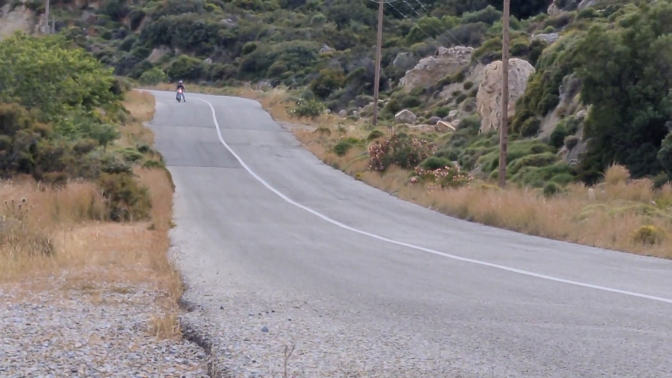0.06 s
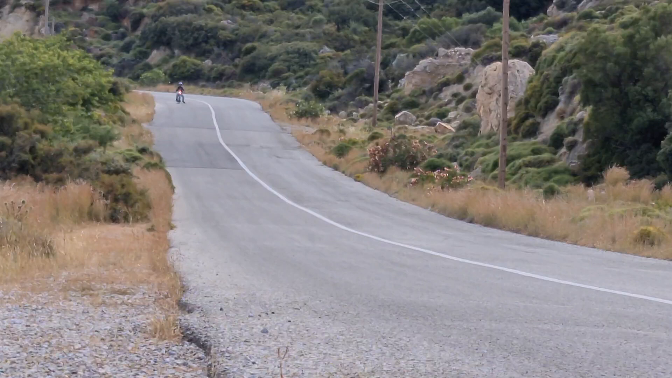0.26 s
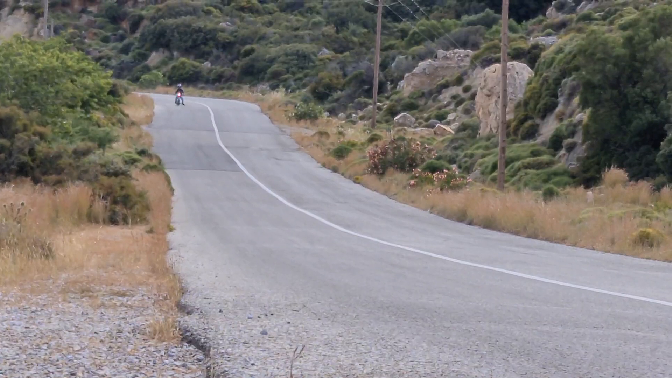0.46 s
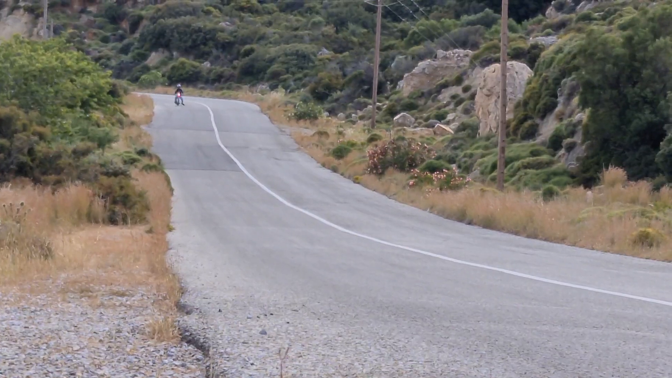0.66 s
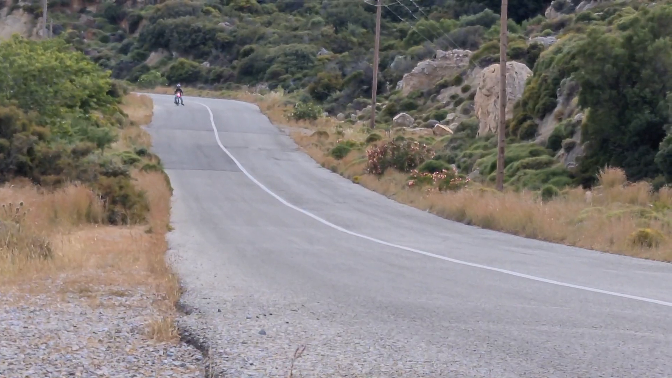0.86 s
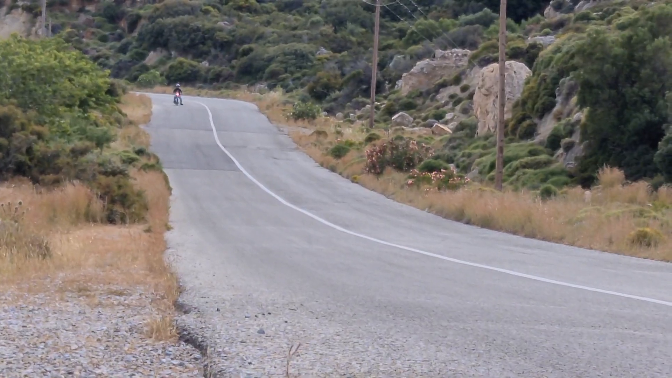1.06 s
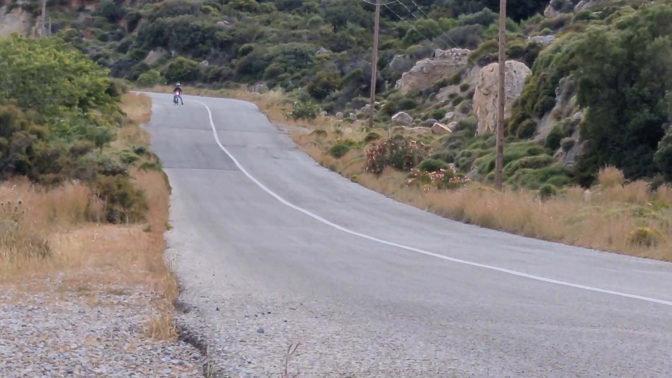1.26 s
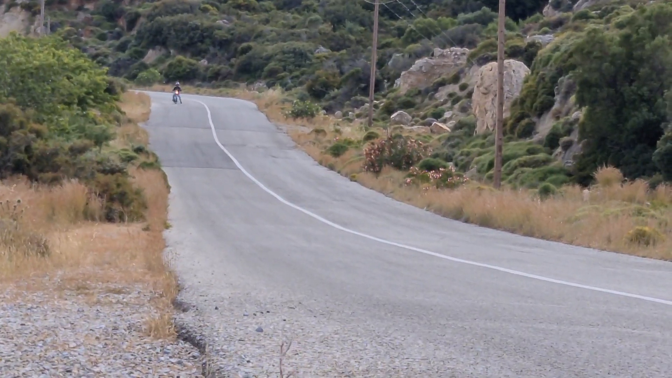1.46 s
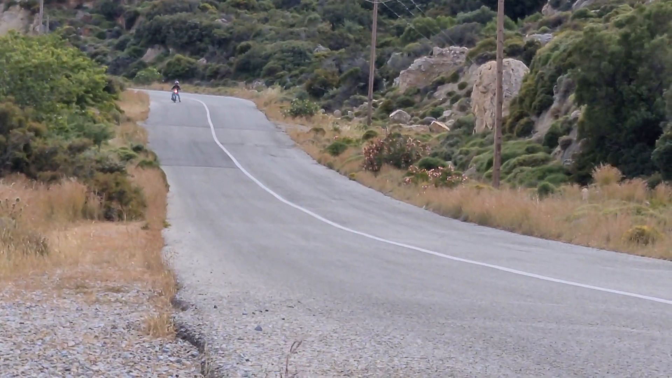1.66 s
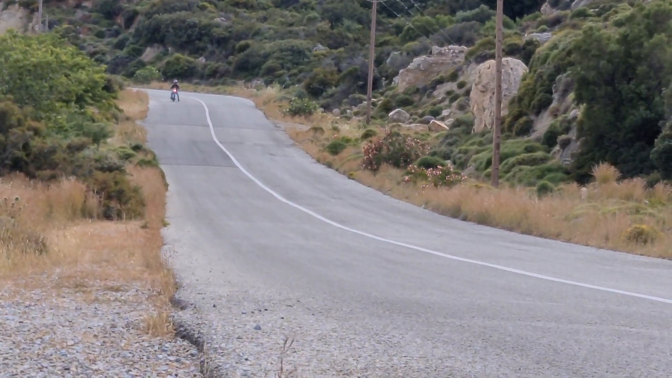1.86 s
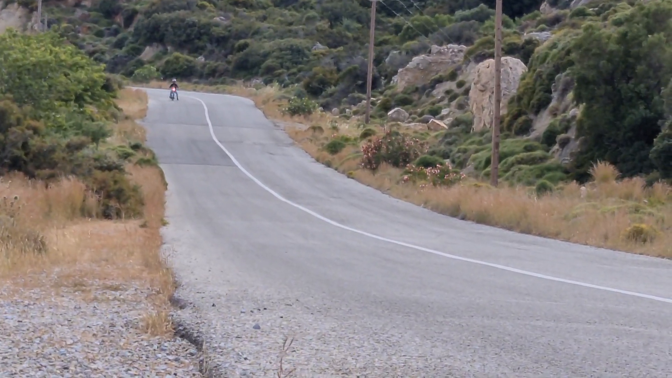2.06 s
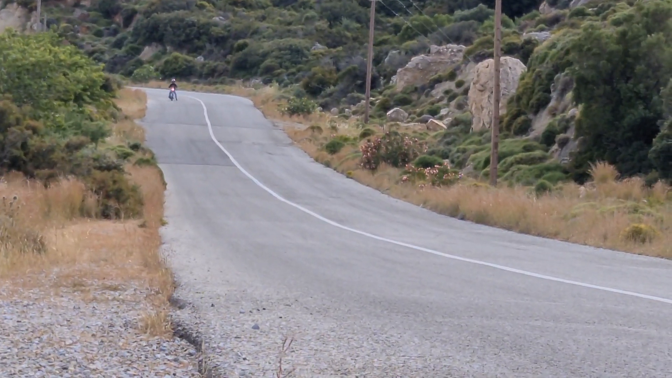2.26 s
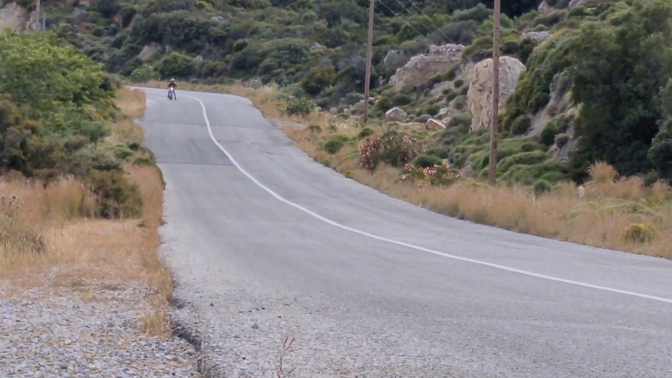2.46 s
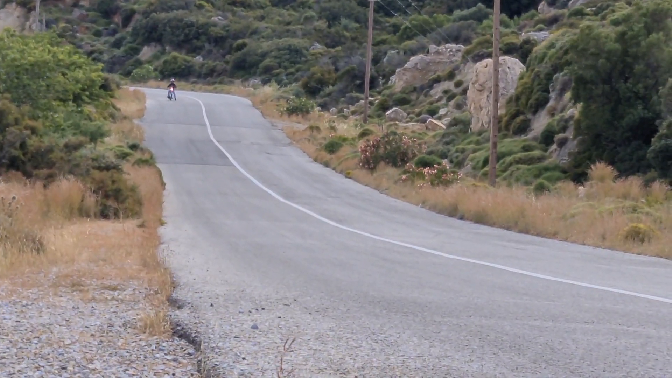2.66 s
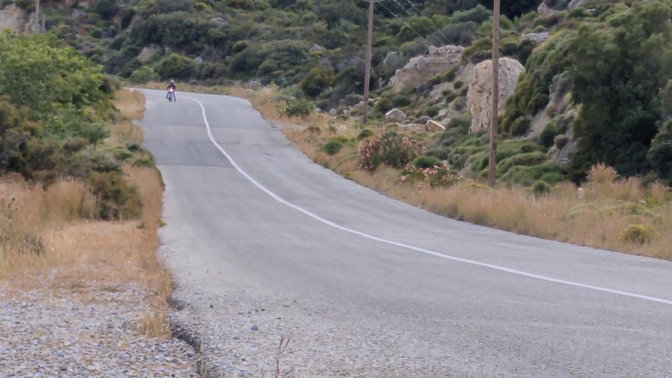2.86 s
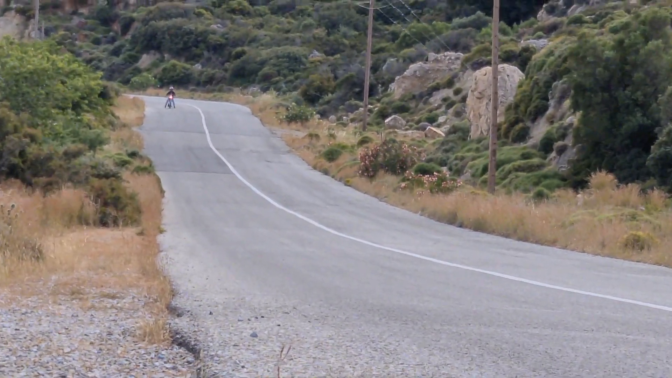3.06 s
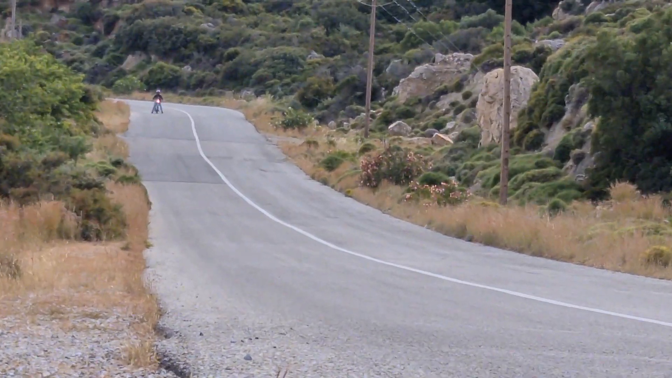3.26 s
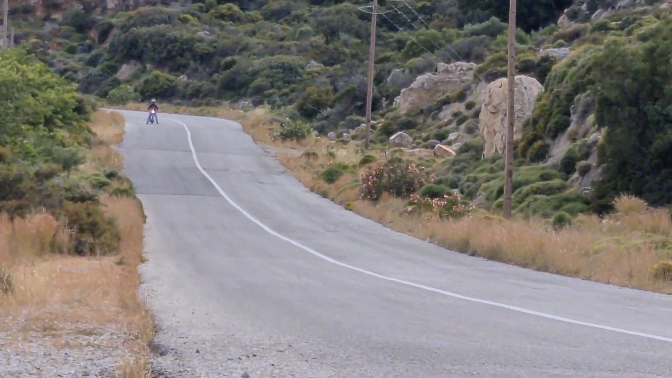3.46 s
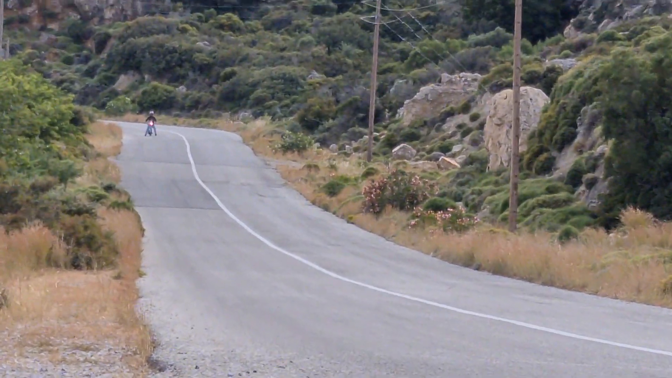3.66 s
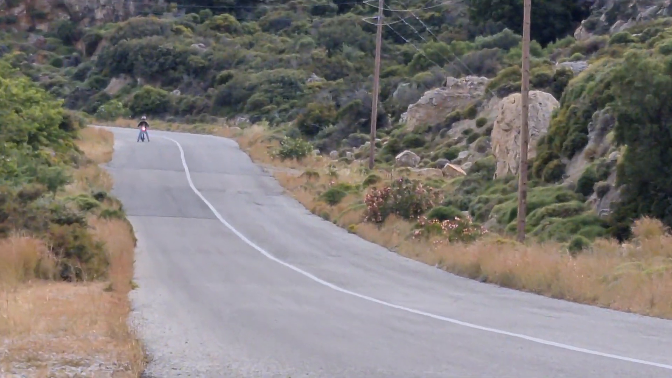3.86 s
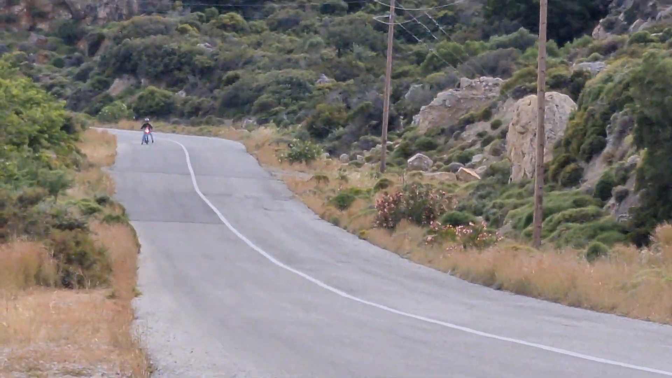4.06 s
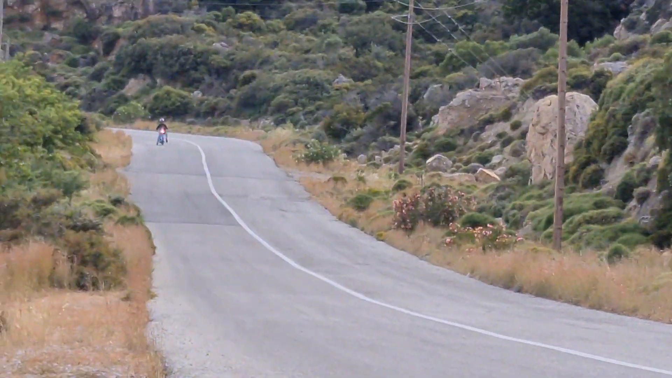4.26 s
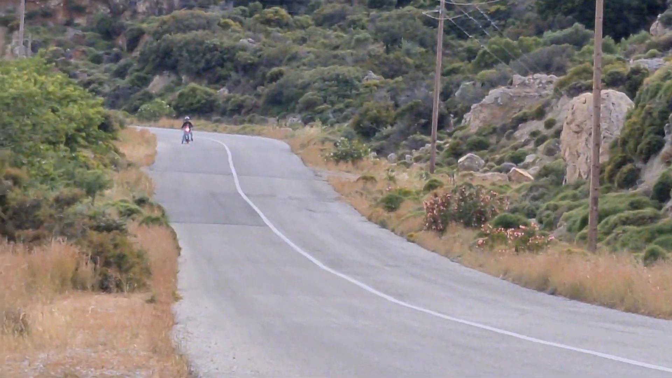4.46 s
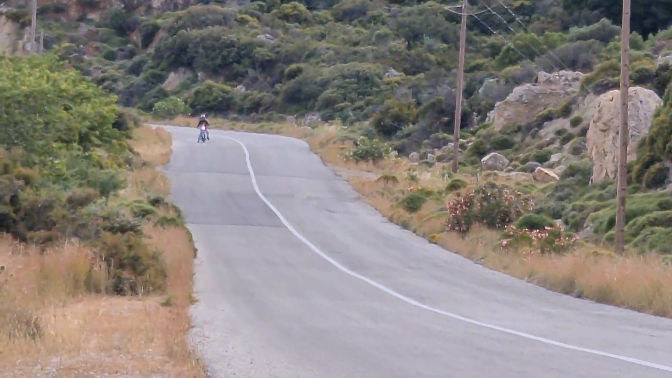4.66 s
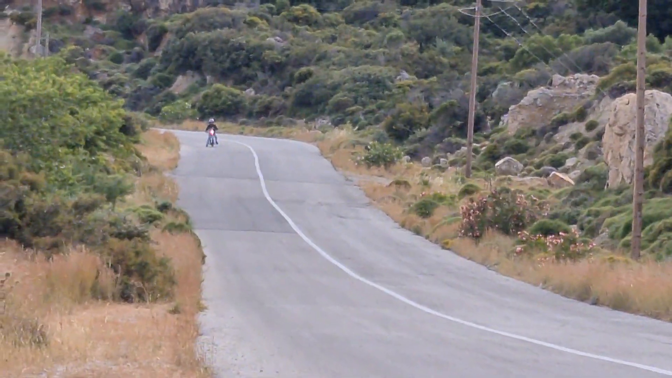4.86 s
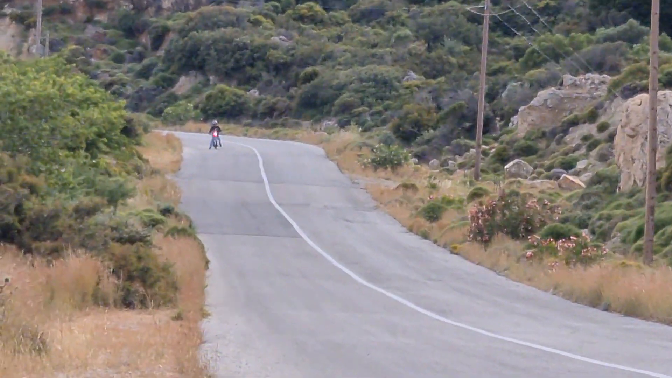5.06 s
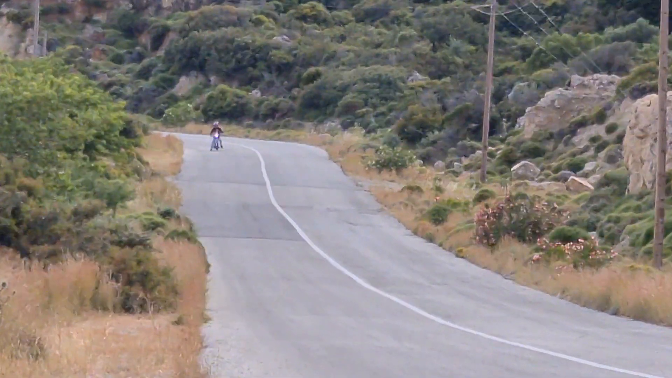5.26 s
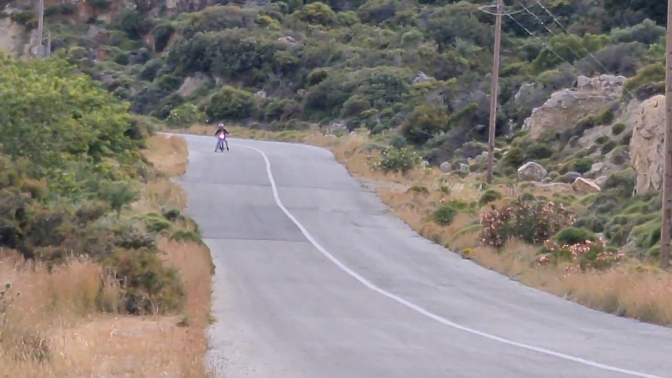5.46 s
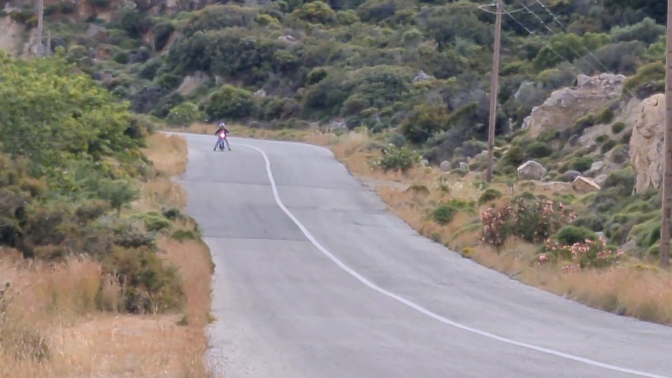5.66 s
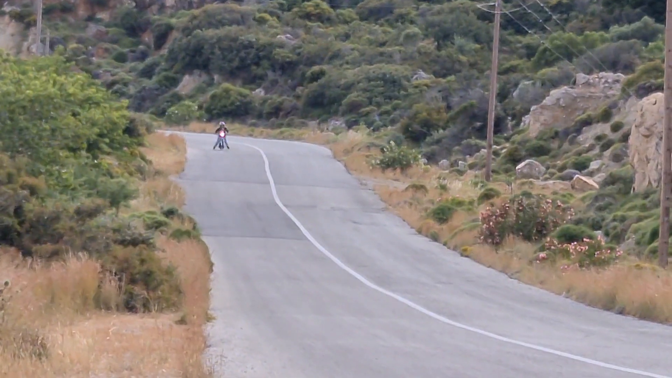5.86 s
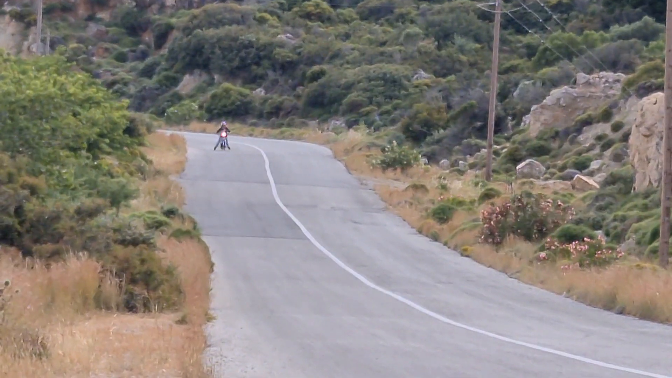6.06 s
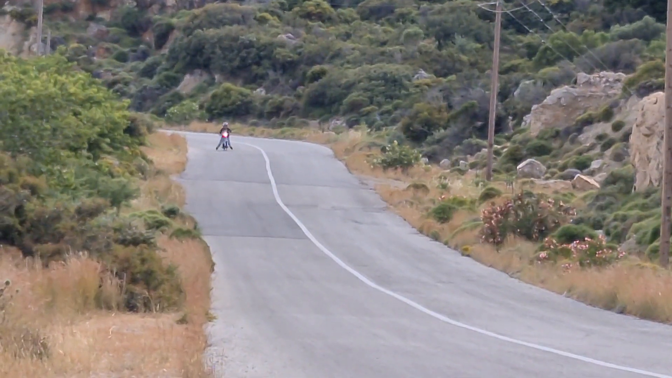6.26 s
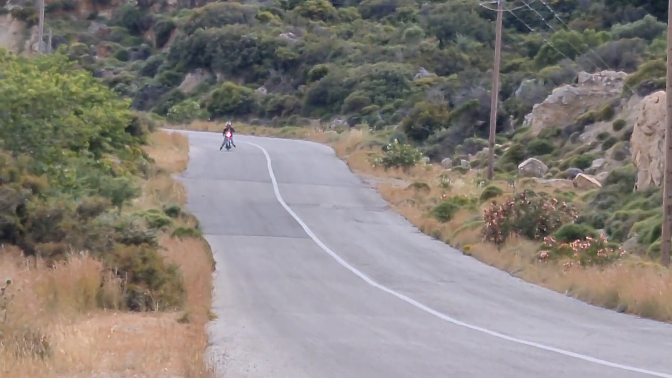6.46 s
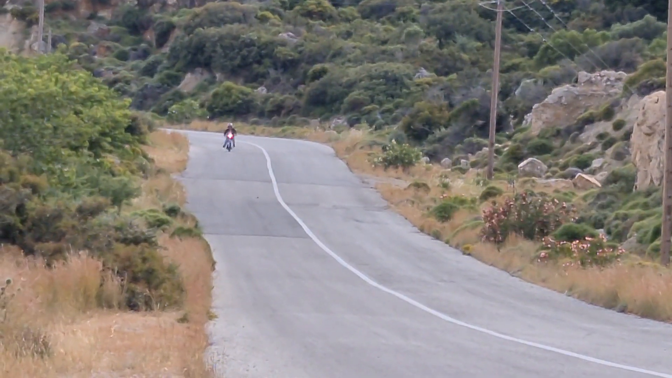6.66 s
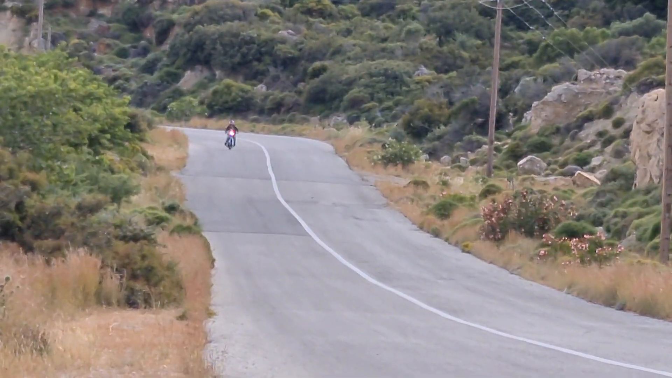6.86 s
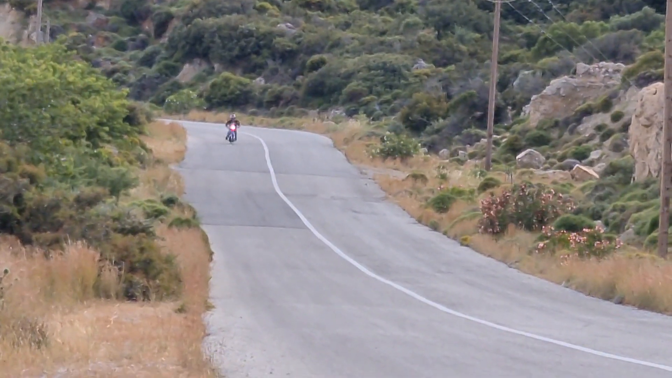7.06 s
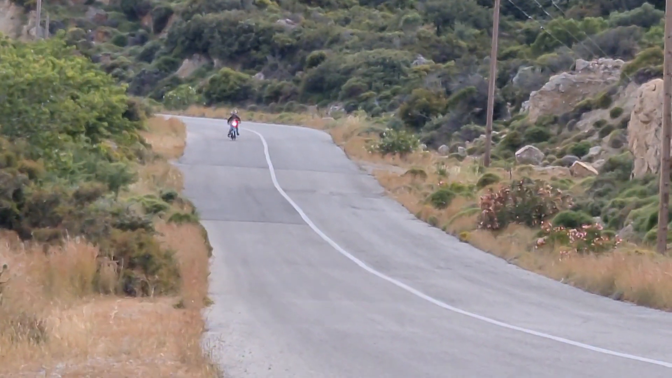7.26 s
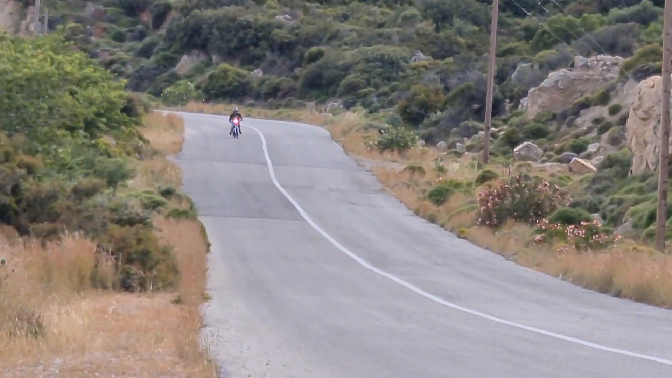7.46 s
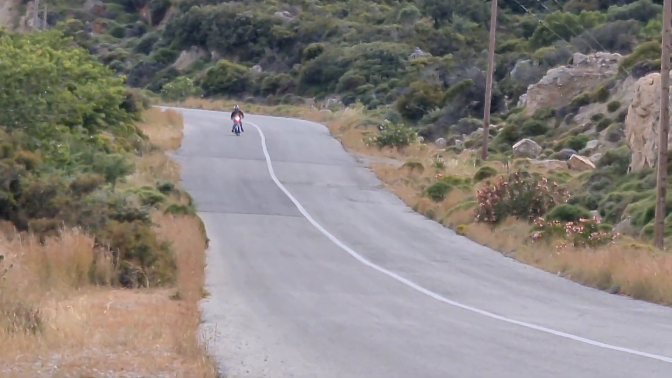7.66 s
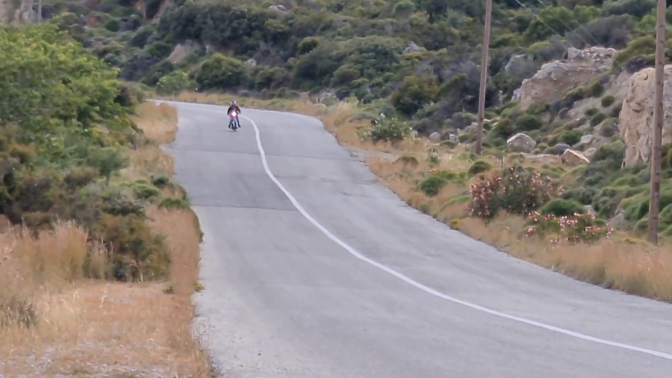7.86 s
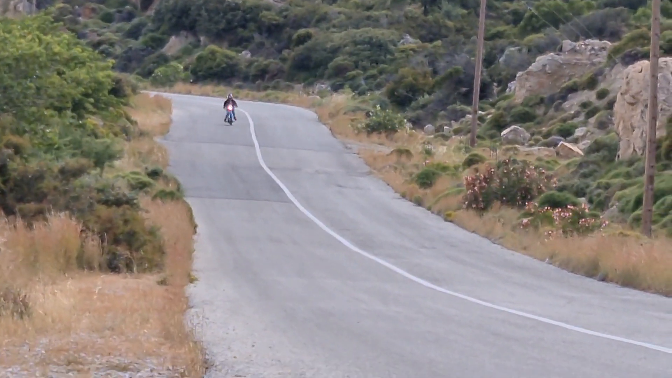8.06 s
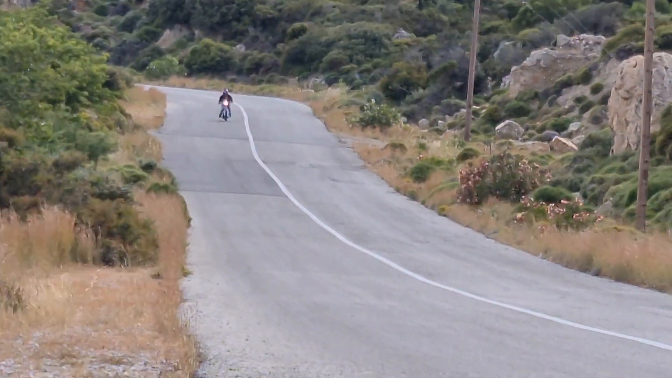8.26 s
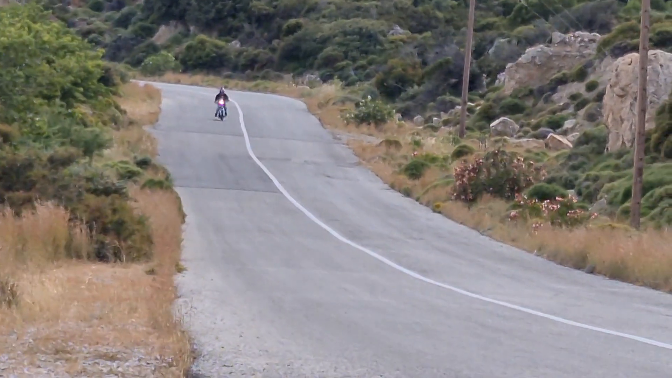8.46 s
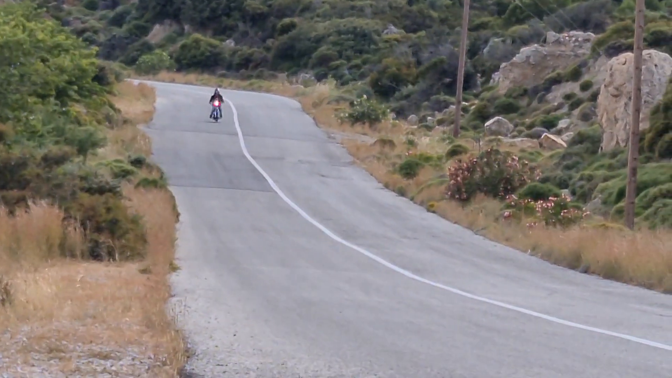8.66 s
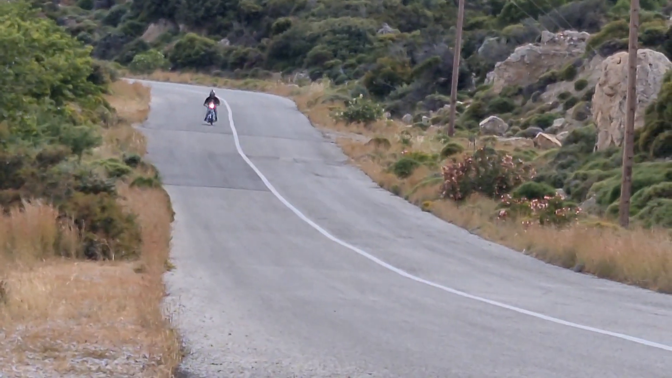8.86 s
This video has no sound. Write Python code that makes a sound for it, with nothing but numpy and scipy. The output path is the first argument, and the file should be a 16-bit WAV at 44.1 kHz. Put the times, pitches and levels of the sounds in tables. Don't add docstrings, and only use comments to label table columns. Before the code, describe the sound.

A small single-cylinder two-stroke starts on a dying rev blip and settles into an irregular, thumping idle with faint ticks. Throttle blips follow, then a held stuttering note, sharp crackles while the clutch slips, and two hard rising surges. After a quick gear change the pitch drops and climbs again, louder and nearer. Open country road, light hillside reflections, low wind buffeting the stereo microphone.

```python
import sys
import numpy as np
from scipy import signal
from scipy.fft import rfft, irfft, next_fast_len
from scipy.io import wavfile
from scipy.ndimage import uniform_filter1d, map_coordinates

SR = 44100
rng = np.random.default_rng(int(sys.argv[2]) if len(sys.argv) > 2 else 0)


def pcm_store(signal):
    levels = np.round(np.clip(np.atleast_2d(signal), -1, 1) * 32767)
    wavfile.write(sys.argv[1], SR, levels.astype(np.int16).T)


def gain_from_decibels(decibels):
    exponent = np.asarray(decibels, float) / 20
    return 10 ** exponent


N = 393372
T = np.arange(N) / SR


def unit(x):
    return x / np.sqrt(np.mean(x ** 2) + 1e-20)


def even(x):
    power = uniform_filter1d(uniform_filter1d(x ** 2, size=2600), size=2600)
    return x / np.sqrt(abs(power) + 0.42 * np.mean(x ** 2, axis=-1, keepdims=True))


def along(points, hz):
    f, v = np.transpose(points)
    return np.interp(np.log(hz + 1), np.log(f + 1), v)


def curves(rows):
    s, *cols = np.transpose(rows)
    return [np.interp(T, s, c) for c in cols]


def during(start, end):
    return np.clip(np.minimum(T - start, end - T) / 0.0092, 0, 1)


def during_runs(runs):
    return sum(during(run[0][0], run[-1][0]) for run in runs)


def wobble(rate):
    return map_coordinates(rng.standard_normal(int(N * rate / SR) + 4), [T * rate])


def filtered(x, response):
    m = next_fast_len(N + SR // 2)
    return irfft(rfft(x, m) * response(np.fft.rfftfreq(m, 1 / SR)), m)[..., :N]


def ringing(x, modes, low_hz, high_hz, hollow=False):
    sign = 1 if hollow else -1

    def response(f):
        peaks = sum(sign ** k * gain_from_decibels(db) * 1j * f * w / (c * c - f * f + 1j * f * w)
                    for k, (c, w, db) in enumerate(modes))
        low_cut = (1j * f / (low_hz + 1j * f)) ** 2
        return peaks * low_cut / (1 - (f / high_hz) ** 2 + 1j * f / high_hz) ** 2
    return filtered(x, response)


def without(x, share, band_hz, width_hz):
    return x - share * signal.lfilter(*signal.iirpeak(band_hz, band_hz / width_hz, SR), x)


def pulses(times, sizes):
    at = np.clip(times * SR, 0, N - 2)
    first, part = at.astype(int), at % 1
    return np.bincount(first, sizes * (1 - part), N) + np.bincount(first + 1, sizes * part, N)


def bursts(train, decay):
    return signal.lfilter([1], [1, -np.exp(-1 / (decay * SR))], train) * rng.standard_normal(N)


# t/s, crank f/Hz, level/dB, throttle/0-1
BLIPS = [
    [(0.012, 55.93, -17, 0), (0.058, 60.7, -19.5, 0.6), (0.104, 62.83, -24, 0), (0.23, 54.33, -27.5, 0.03),
     (0.458, 43.5, -30.5, 0.1), (0.554, 37.47, -38, 0.01), (0.8, 31, -51, 0)],
    [(3.419, 30.34, -28, 0.5), (3.485, 41.87, -22, 0.6), (3.563, 53.8, -19, 0.7),
     (3.607, 56.75, -23.5, 0.5), (3.863, 43.22, -28.5, 0), (3.971, 33.88, -26.5, 0.6),
     (4.115, 58, -21, 0.8), (4.2, 61.4, -19.5, 0.6)],
    [(4.212, 65.1, -20.5, 0.6), (4.29, 66.9, -18.5, 0.7)],
    [(4.292, 63.9, -21, 0.1), (4.418, 57.47, -26, 0), (4.45, 57.9, -22.5, 0.05)],
    [(4.461, 56.4, -26.5, 0.82), (4.507, 57.36, -23.5, 0.7), (4.749, 57.65, -21.5, 0.7),
     (5.03, 60.73, -21, 0.85)],
]
# t/s, crank f/Hz, level/dB, throttle/0-1
SLIP = [(5.04, 62.8, -20.5, 0.83), (5.08, 63.04, -21, 0.32), (5.4, 62.56, -21.5, 0.11),
        (5.749, 64.04, -22.5, 0.15), (5.989, 64.8, -23, 0.44), (6.109, 64.5, -21.5, 0.72)]
SURGE = [(6.131, 67.6, -20, 0.63), (6.179, 73.2, -16, 1), (6.219, 77.37, -17, 0.7),
         (6.409, 84.14, -17.5, 0.3), (6.497, 86.34, -14, 0.37), (6.662, 84.5, -17.5, 0.28),
         (6.779, 82.1, -15, 0.16), (7.01, 72.4, -18, 0.29), (7.075, 69.83, -15.5, 1)]
AGAIN = [(7.111, 71, -20.5, 1), (7.16, 75.16, -16.5, 0.54), (7.36, 91.06, -16.5, 0.097),
         (7.56, 102.9, -14.5, 0.69), (7.65, 107.8, -13.5, 0.55), (7.772, 106, -11.5, 0.25),
         (7.85, 100.1, -18.5, 0.68), (7.928, 97.85, -14, 0.39), (7.99, 90.2, -13, 0.38)]
GEAR = [(8.058, 72.94, -15.5, 0.29), (8.502, 85.2, -12.5, 0.18), (8.7, 90.3, -11.5, 0.23),
        (8.92, 96.3, -6, 0.23)]
RUNS = BLIPS + [SLIP + SURGE + AGAIN + GEAR]
IDLE_END_S, HELD_S, SLIP_S, BITE_S = BLIPS[1][0][0], BLIPS[4][0][0], SLIP[0][0], SLIP[-1][0]


def rider():
    hz, level_db, throttle = curves(sum(RUNS, []))
    return hz, level_db, np.clip(throttle, 0, 1)


def in_gear():
    return np.clip((T - BITE_S) / 0.066, 0, 1)


SHIFT_S = 7.858


def shifting():
    return np.clip((.046 - abs(T - SHIFT_S)) / 0.055, 0, 1)


def gaining(hz):
    return uniform_filter1d(np.clip(np.gradient(hz) * SR / 68, .05, 1), size=900)


# t/s, crack level/dB
BANGS = [(4.4044, -44), (5.0858, -28), (5.1796, -36), (5.2579, -36), (5.3692, -32), (5.4475, -34),
         (5.5418, -31), (5.6201, -27), (5.6984, -33), (5.7932, -36), (5.8875, -30), (5.9798, -35),
         (6.0586, -30), (7.7444, -28)]


def kicks():
    s = np.transpose(BANGS)[0][1:-1]
    moments = np.ravel([s - .006, s + .006], "F")
    swing = np.tile([-1, 1], len(s))
    swing[-1] = 0
    return 1 + 0.032 * np.interp(T, moments, swing, left=0)


def crank(run):
    hz = np.interp(T, *np.transpose(run)[:2])
    return np.cumsum(hz * kicks() * ((T >= run[0][0]) & (T < run[-1][0]))) / SR


def crank_angle():
    return 2 * np.pi * sum(crank(run) * (T >= run[0][0]) * (T < run[-1][0]) for run in RUNS)


# t/s, ragged share/0-1
RAGGED = [
    (0, .05),
    (3.4, .04),
    (4.46, .025),
    (5.04, .08),
    (6.15, .02),
    (7.72, .14),
    (7.82, .03),
    (7.9, .05),
    (8.07, .015),
]


def raggedness():
    s, share = np.transpose(RAGGED)
    steps = share[np.searchsorted(s, T, side="right") - 1]
    return uniform_filter1d(steps, size=2000) + .06 * (1 - rider()[2])


SECOND_DB = [0, 0, -11, -1, -12, 0]


def firings():
    ragged = raggedness()
    late = np.r_[-1, np.transpose(BANGS)[0]]
    train = np.zeros(N)
    for run, second_db in zip(RUNS, SECOND_DB):
        turns = crank(run)
        count = np.arange(int(turns[-1] + .5))
        s = np.interp(count, turns + 1e-9 * T, T) + (count == 0) * run[0][0]
        since = s - late[np.searchsorted(late, s + .006) - 1]
        luck = rng.standard_normal((len(s), 2)) * np.interp(s, T, ragged)[:, None]
        size_db = second_db * (count % 2) + 3 * np.exp(-abs(since) / .025) + 14 * luck[:, 1]
        train += pulses(s + .0011 * luck[:, 0], gain_from_decibels(size_db))
    return train, ragged


# f/Hz, width/Hz, level/dB
PIPE = [(122, 100, -10), (196, 42, -3.5), (269.3, 32, 7.5), (303, 580, 0)]


def exhaust(gas, pipe_db):
    push, skipping = gas(PIPE, 58, 528), during(HELD_S, SLIP_S)
    steady = np.roll(push, -150)
    four_stroking = 0.61 * np.roll(push, 640) + 1.23 * np.roll(push, -170)
    receding_db = -4 * np.clip((T - ROAD_FROM_S) / 0.96, 0, 1)
    level = gain_from_decibels(pipe_db - 3.0 + receding_db - 16 * shifting())
    return level * ((1 - skipping) * steady + skipping * four_stroking)


# f/Hz, width/Hz, level/dB
INTAKE = [(426.6, 15, 1.5), (528.3, 29, 8.5), (550, 170, -7.5), (593, 350, -4)]
# f/Hz, width/Hz, level/dB
HONK = [(1080, 70, 0), (1350, 110, -8)]


def intake(gas, open_still, intake_db):
    breath = np.roll(gas([(514, 67, 6.5), (300, 190, -15.5)], 270, 830), 71)
    drawn = (1 - open_still) * gas(INTAKE, 150, 716) - open_still * gain_from_decibels(4.5) * breath
    return gain_from_decibels(intake_db + 0.5) * drawn


# f/Hz, width/Hz, level/dB
BARK = [(600, 62, -34.5), (777.4, 25, 14.5), (871, 39, 12), (1105, 110, 5), (1462, 23, -5.5)]


def shell(gas, bark_db):
    bark = gas(BARK, 190, 1500)
    return gain_from_decibels(bark_db) * (.8 * np.roll(bark, 70) + .6 * np.roll(bark, 245))


def whine(hz, colour, orders):
    angle, coarse, lines = np.float32(crank_angle() % (2 * np.pi)), slice(0, N, 512), np.zeros(N)
    for k in orders:
        swell_db = 4 * np.interp(T[coarse], np.arange(64) / 7, rng.standard_normal(64))
        level = np.interp(T, T[coarse], gain_from_decibels(along(colour, k * hz[coarse]) + swell_db))
        lines += level * np.sin(k * angle + rng.uniform(0, 7.93))
    return even(lines) * during_runs(RUNS)


# f/Hz, level/dB per Hz
FINS = [(800, -3.5), (1200, -2), (1500, -4.5), (1950, 0), (2200, -6.5), (2600, -24), (3200, -63.5),
        (5000, -120)]
# f/Hz, level/dB per Hz
SIZZLE = [(2000, -34.5), (2600, -6), (3300, 2), (4300, -9.5), (4950, -9), (6800, -22), (7700, -32),
          (9600, -87)]
# t/s, level/dB
NEAR = [(0, -19), (.5, -24), (3.4, -15.5), (3.7, -31), (4.1, -18.5), (5, -20.5), (6.2, -7.5), (7.7, -9),
        (8.92, -11)]


def cooling_fins(train, ragged, hz, puffs):
    knocks = np.roll(train, 110) - .8 * np.roll(train, 260) + .6 * np.roll(train, 395)
    clank, rasp = even(filtered(np.array([knocks, puffs]), lambda f: gain_from_decibels(along(FINS, f))))
    fins = gain_from_decibels(-2) * clank + gain_from_decibels(-3 - 4 * in_gear()) * rasp
    fins += gain_from_decibels(4 - 40 * ragged) * whine(hz, FINS, range(12, 34))
    sizzle = gain_from_decibels(curves(NEAR)[0]) * even(filtered(puffs, lambda f: gain_from_decibels(along(SIZZLE, f))))
    dulled = signal.lfilter(*signal.butter(4, 5200, fs=SR), sizzle)
    return fins + sizzle + np.clip((4.76 - T) / .5, 0, 1) * (dulled - sizzle)


# middle t/s, half length t/s, f/Hz, width/Hz, level/dB
SINGING = [(0.08, 0.048, 1079, 61.6, -26), (0.186, 0.12, 3480, 600, -55), (0.046, 0.022, 4900, 300, -45.5),
           (0.051, .05, 3210, 410, -48), (0.165, 0.053, 2050, 200, -40.5), (.3, .2, 4870, 402, -83),
           (3.47, 0.046, 3280, 298, -60), (3.63, .05, 4000, 250, -66), (4.05, 0.13, 5050, 163, -75.5),
           (4.154, 0.19, 3120, 354, -63.5), (4.092, 0.09, 1870, 199, -39.5), (4.495, 0.26, 4910, 200, -67),
           (4.65, 0.38, 3570, 250, -59), (4.905, 0.14, 1808, 151.7, -32), (4.96, 0.12, 3320, 403, -49),
           (5.24, 0.11, 4070, 149, -58), (5.989, 0.25, 1960, 130, -34), (5.59, 0.49, 952, 195, -28.5),
           (5.595, 0.43, 785, 69.3, -36), (6.4, .13, 3530, 353, -43), (7.444, 0.098, 4900, 300, -44.5),
           (6.854, .15, 3330, 400, -47), (8.502, .2, 4800, 502, -48.5), (6.491, 0.051, 1895, 197, -26.5),
           (6.815, 0.17, 2007, 217, -27), (6.979, 0.19, 1120, 146.5, -29.5),
           (7.356, 0.071, 2000, 145.9, -36.5), (7.659, .08, 1521, 52.07, -32),
           (7.664, 0.072, 2020, 117.3, -33), (7.758, 0.23, 1850, 123.4, -27.5)]


def singing(puffs):
    out = np.zeros(N)
    for s, half, ring_hz, width_hz, db in SINGING:
        span = slice(max(int((s - half) * SR), 0), int((s + half) * SR))
        band = signal.iirpeak(ring_hz, ring_hz / width_hz, SR)
        ring = signal.lfilter(*band, signal.lfilter(*band, puffs[span]))
        out[span] += gain_from_decibels(db) * unit(ring) * np.cos(np.pi / 2 * (T[span] - s) / half)
    return out


def without_orders(x, orders, start):
    at = int(start * SR)
    turn, part = np.exp(1j * crank_angle()[at:]), x[at:]
    found = sum(2 * (turn ** k * uniform_filter1d(part * turn ** -k, size=1500)).real for k in orders)
    return x - in_gear() * np.r_[np.zeros(at), found]


ROAD_FROM_S = 8.3


def cancelled(body):
    still = during(-1, SLIP_S)
    body = without(body, in_gear() * (1 - shifting()), 647, 29)
    body = without(body, np.clip((T - ROAD_FROM_S) / 0.7, 0, 1), 360, 77)
    body = without(body, 0.77 * still, 353, 55)
    body = without(body, .8 * still, 625, 120)
    return without_orders(body, [2, *range(5, 14)], BITE_S)


# level/dB over the rider's, level/dB with full throttle,
# level/dB per doubling of speed, level/dB in gear
VOICES = [
    (3, 1.3, 2.5, -3),
    (-5, 10, 1, -5),
    (-6, -9.5, -0.5, -3.5),
    (-15, -3, -1.5, 1.5),
    (0, -9.5, 4.5, -28.5),
]
# f/Hz, level/dB
OVERRUN = [(250, -4), (450, 4), (650, -27), (850, -8), (1100, -13.5), (1500, -16.5), (2000, -41)]


def engine():
    hz, level_db, throttle = rider()
    pipe_db, intake_db, bark_db, fins_db, honk_db = [
        level_db + db + open_db * throttle + fast_db * np.log2(hz / 60) + gear_db * in_gear()
        for db, open_db, fast_db, gear_db in VOICES]
    train, ragged = firings()
    drive, share = np.array([train, bursts(train, 0.034)]), np.sqrt([1 - ragged, ragged])

    def gas(*tube):
        return np.sum(share * even(ringing(drive, *tube)), axis=0)

    still = during(-1, SLIP_S)
    open_still = throttle * still
    body = exhaust(gas, pipe_db) + intake(gas, open_still, intake_db) - shell(gas, bark_db)
    body += gain_from_decibels(honk_db) * gaining(hz) * gas(HONK, 610, 1100)
    body += gain_from_decibels(level_db + 2.5) * (1 - throttle) * still * whine(hz, OVERRUN, range(5, 28))
    body = cancelled(body)

    drawing = np.where(T > SLIP_S, 0.47 + 0.71 * in_gear(), throttle)
    puffs = even(bursts(np.roll(train, 90), .0055)) * (.4 + .6 * drawing)
    puffs += (.8 - .5 * drawing) * rng.standard_normal(N)
    beat = signal.lfilter([1], [1, -np.exp(-1 / (0.0093 * SR))], np.roll(train, -60))
    gate = 1 - .7 * open_still * (1 - even(uniform_filter1d(beat, size=60)))
    treble_db = fins_db + wobble(23) - 4.5 * during(SHIFT_S + .15, 10)
    treble = gain_from_decibels(treble_db) * gate * cooling_fins(train, ragged, hz, puffs)

    struck = 0.61 * unit(np.roll(train, 90)) + 0.39 * unit(bursts(train, .008))
    struck += 0.53 * rng.standard_normal(N)
    running = uniform_filter1d(1. * ((T < RUNS[0][-1][0]) | (T > IDLE_END_S)), size=200)
    return singing(struck) + running * (body + treble)


# order, level/dB over the rider's
REV = [(4, -8.5), (5, -3.5), (13, -10.5), (19, -20), (20, -21)]


def blip_orders(line):
    hz, level_db, throttle = rider()

    def hum(order, db):
        return line(order, level_db + db) / np.hypot(1, (order * hz - 156.5) / 29.5)

    shut = np.clip(1 - throttle / 0.63, 0, 1) * during_runs(BLIPS)
    rev = throttle * gaining(hz) * during_runs(BLIPS[:2])
    return [shut * (hum(order=4, db=5.5) + hum(order=3, db=-4)),
            rev * sum(line(int(k), level_db + db) for k, db in REV)]


def slipping_orders(line):
    slipped = T - SLIP_S
    held = line(order=2, db=-36 + 9.5 * slipped) + line(order=7, db=-29 + 5.5 * slipped)
    return during(SLIP_S, SURGE[1][0]) * held


# t/s, orders above the seventh level/dB, second, fifth, sixth order level/dB
LOAD = [(6.1, 4, -21.5, -26.5, -12.5), (6.2, -3, -25.5, -31.5, -12.5), (6.5, 2.5, -27, -29, -12.5),
        (6.68, -4, -30.5, -32, -13), (6.78, 1, -25.5, -24, -15.5), (6.9, -7.5, -27, -30, -13.5),
        (7.02, -7.5, -22.5, -20, -15.5), (7.16, -10, -27, -27.5, -14.5), (7.36, -7, -20, -26, -15.5),
        (7.46, -2.5, -24, -20.5, -30), (7.58, 3.5, -20, -16, -22.5), (7.72, 4, -18, -24.5, -24.5),
        (7.9, 1, -21, -19.5, -23.5), (8.04, 3.5, -22.5, -26, -12), (8.15, 0.5, -30.5, -28.5, -14.5),
        (8.3, 3.5, -23, -28, -11.5), (8.52, 2.5, -21.5, -17, -12.5), (8.92, 6, -21.5, -25, -17)]
# f/Hz, level/dB
BLOW = [(480, -22.5), (510, -22.5), (560, -24.5), (620, -37), (700, -24.5), (850, -29), (1150, -40.5),
        (1350, -44.5)]


def loaded_orders(line):
    hz = rider()[0]
    load_db, second_db, fifth_db, sixth_db = curves(LOAD)
    thump = line(order=1, db=-32) + line(order=2, db=second_db) + line(order=5, db=fifth_db)
    blow = 0
    for k in range(7, 14):
        skipped_db = -16 * (k == 11)
        blow = blow + line(k, along(BLOW, k * hz) + load_db * (k > 7) + skipped_db + 3.5 * wobble(8.3))
    return [in_gear() * (line(order=6, db=sixth_db) + (1 - shifting()) * thump),
            shifting() * (line(order=8, db=-15) + line(order=7, db=-18)),
            in_gear() * blow]


def crank_orders():
    angle = crank_angle()

    def line(order, db):
        return gain_from_decibels(db) * np.sin(order * angle + np.pi * 1.1)

    parts = [*blip_orders(line), slipping_orders(line), *loaded_orders(line)]
    return sum(gain_from_decibels(3 + 1.5 * wobble(24)) * part for part in parts)


# f/Hz, t60/s
HILL = [(100, .45), (600, .4), (2000, .3), (8000, .2)]
# f/Hz, level/dB
WET = [(60, -14), (200, -20), (600, -22), (1000, -15), (1700, -8), (4000, -4), (8000, -10)]


def hillside(x):
    hz, t, z = signal.stft(rng.standard_normal((2, SR // 2)), SR, nperseg=256)
    tail = signal.istft(z * gain_from_decibels(-60 * t / along(HILL, hz)[:, None]), SR, nperseg=256)[1]
    delayed = np.pad(x, (300, 0))[None]
    far = signal.fftconvolve(delayed, tail / np.linalg.norm(tail[0]), axes=1)[:, :N]
    return filtered(far, lambda f: gain_from_decibels(along(WET, f)))


# t/s, peak level/dB
GUSTS = [(0, -54.5), (0.989, -47.5), (1.29, -41.5), (1.8, -51), (2.38, -42), (2.62, -47), (2.75, -46),
         (2.98, -43), (3.35, -46), (4.2, -46.5), (4.47, -41), (4.901, -47), (5.24, -46), (5.591, -35.5),
         (5.841, -39), (6.14, -38.5), (6.3, -38), (6.679, -41), (8.9, -58.5)]


def gusts_db():
    lumps = [db + np.minimum(50.5 * (T - s), 118.5 * (s - T)) for s, db in GUSTS]
    return np.max(lumps + [-62 + 0 * T], axis=0)


# f/Hz, level/dB per Hz
GUST = [(15, -32.5), (35, -15), (70, -13), (130, -23), (220, -31.5), (400, -53.5), (600, -120)]
# f/Hz, level/dB per Hz
HISS = [(1800, -40), (2600, 5), (4500, 4), (6800, -7), (9000, -1), (12000, -1), (14400, -1)]
# t/s, level/dB
HISS_DB = [(0, -92), (.5, -73.5), (3.4, -73.5), (3.5, -86), (3.75, -78), (4.1, -86), (4.7, -104),
           (4.9, -124), (8.92, -124)]


def wind():
    noise = rng.standard_normal((4, N))
    lumps = gain_from_decibels(5.0 * np.array([wobble(7.5), wobble(14)]))
    buffet = unit(lumps * filtered(noise[:2], lambda f: gain_from_decibels(along(GUST, f))))
    hiss = unit(filtered(noise[2:], lambda f: gain_from_decibels(along(HISS, f))))
    return gain_from_decibels(gusts_db() + 14.5) * buffet + gain_from_decibels(curves(HISS_DB)[0]) * hiss


# t/s, level/dB
PUFFS = [(.53, -32.5), (.66, -34.5), (.8, -38), (1.5, -38), (2.2, -40.5), (2.8, -38), (3.42, -34)]
# f/Hz, width/Hz, level/dB
SLOW_PIPE = [(180, 19, -3), (289, 69, -15.5), (407, 41, -4)]
# f/Hz, width/Hz, level/dB
SLOW_SHELL = [(872, 33, 8), (1200, 105, -33), (1927, 38, -16.5)]


def pumped_air(firing_s):
    idle_hz = 28
    marks = np.r_[firing_s[0] - 8 / idle_hz, firing_s, IDLE_END_S]
    turns = np.r_[0, np.cumsum(np.round(np.diff(marks) * idle_hz))]
    puff_s = np.interp(np.arange(turns[-1]), turns, marks)
    luck = rng.standard_normal((len(puff_s), 2))
    air = pulses(puff_s, gain_from_decibels(2 * luck[:, 0])) + pulses(puff_s + .009, gain_from_decibels(3 + 3 * luck[:, 1]))
    breath = unit(bursts(air, .02))
    air = unit(air) + 1.1 * breath
    pumped = unit(ringing(air, SLOW_PIPE, 28, 298, True))
    pumped += gain_from_decibels(-24.5) * unit(ringing(breath + 0.15 * air, SLOW_SHELL, 480, 2400, True))
    cracked = np.clip((T - 2.42) / 0.1, 0, 1)
    pumped += gain_from_decibels(-21.5) * cracked * unit(ringing(air, [(727, 11, 0)], 600, 690))
    return gain_from_decibels(curves(PUFFS)[0]) * during(-1, IDLE_END_S + 0.016) * pumped


# t/s, peak level/dB, crack level/dB
IDLE = [(0.82, -10, -24.5), (0.949, -13, -26), (1.021, -12, -28), (1.122, -13.5, -25), (1.225, -14.5, -26),
        (1.331, -15.5, -45), (1.434, -16.5, -53), (1.509, -19, -85), (1.582, -15, -37), (1.691, -14, -29),
        (1.796, -14.5, -26), (1.868, -13.5, -25), (1.941, -14.5, -24), (2.044, -13.5, -32),
        (2.116, -16, -29), (2.182, -15, -33), (2.289, -17.5, -26), (2.389, -14, -29), (2.491, -16, -21.5),
        (2.601, -13.5, -22.5), (2.673, -16.5, -17), (2.75, -14, -20.5), (2.816, -17, -16), (2.89, -16, -22),
        (2.967, -19, -20), (3.042, -16, -31), (3.12, -12, -54.5), (3.19, -15, -18.5), (3.269, -13.5, -17),
        (3.343, -14, -16.5)]


def idle():
    s, db, crack_db = np.transpose(IDLE)
    blow = pulses(s + 0.0012, 0.11 * gain_from_decibels(db)) - pulses(s, gain_from_decibels(db))
    thump = ringing(blow, [(149.0, 22.0, 8.0), (287, 770, -9), (461, 26, 3.0)], 78, 353)
    spread = uniform_filter1d(pulses(s + 0.00078, gain_from_decibels(db + crack_db)), size=300)
    crack_modes = [(833, 41, 12.5), (1120, 340, -7.5), (1960, 230, -13.5)]
    crack = ringing(bursts(spread, 0.019), crack_modes, 850, 2150)
    return pumped_air(s) + gain_from_decibels(35) * thump + gain_from_decibels(10.5) * crack


# t/s, f/Hz, peak level/dB
TICKS = [(.8257, 3620, -66), (1.125, 3900, -65), (1.583, 3760, -67), (1.693, 4100, -67), (1.80, 3630, -65),
         (2.349, 3900, -65), (2.7508, 3600, -68), (2.896, 3250, -59), (2.9698, 3650, -54),
         (3.1184, 4250, -63), (3.1943, 4220, -56), (3.3464, 3530, -64)]


def ticks():
    out, t = np.zeros(N), T[:900]
    for s, ring_hz, db in TICKS:
        ring = gain_from_decibels(db - 60 * t / .016) * np.sin(2 * np.pi * ring_hz * t)
        out[int(s * SR):][:900] += ring * np.clip(t / .001, 0, 1)
    return out


def late_burns():
    s, db = np.transpose(BANGS)
    bright = filtered(bursts(pulses(s, gain_from_decibels(db)), 0.0066), lambda f: gain_from_decibels(along(SIZZLE, f)))
    thud_db = np.interp(s, T, rider()[1] - 7 * in_gear()) + 3 + .1 * (db + 33)
    thud = ringing(pulses(s, gain_from_decibels(thud_db)), [(300, 1200, 9), (670, 200, 9)], 60, 1000)
    return gain_from_decibels(5) * bright + gain_from_decibels(30) * thud


# f/Hz, left minus right level/dB
LEAN = [(100, 0), (600, .4), (1200, 4), (1860, 9), (2850, 2), (8000, 2)]
# f/Hz, left lead/rad
LEAD = [(560, 0), (860, .15), (1290, -.2), (1640, .7), (2100, -.8), (2800, -1.4), (4500, -1.1), (8000, 0)]


def scene():
    bike = engine() + crank_orders() + idle() + ticks() + late_burns()

    def ports(f):
        half = gain_from_decibels(along(LEAN, f) / 2) * np.exp(.5j * along(LEAD, f))
        low_cut = f ** 4 / (f ** 4 + 34 ** 4)
        return np.array([half, 1 / half]) * low_cut

    return filtered(bike, ports) + hillside(bike) + wind()


def roll_off(x):
    return signal.sosfilt(signal.butter(12, 14500, fs=SR, output="sos"), x)


def record(dry):
    limited = dry / (1 + abs(dry) ** 8) ** (1 / 8)
    return roll_off(limited)


dry = scene()
out = record(dry)
pcm_store(out)
```